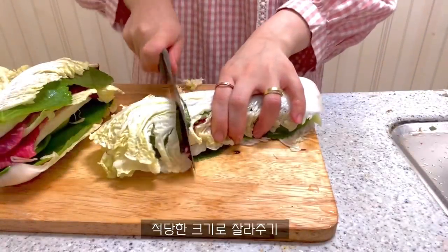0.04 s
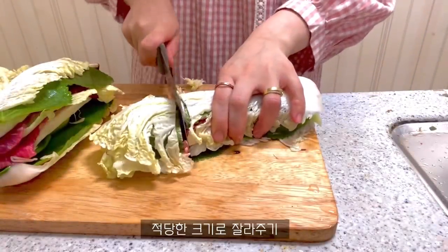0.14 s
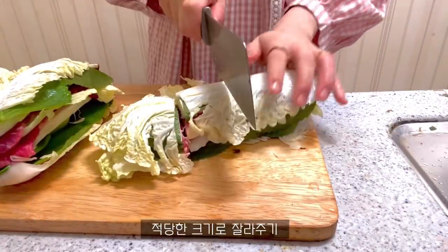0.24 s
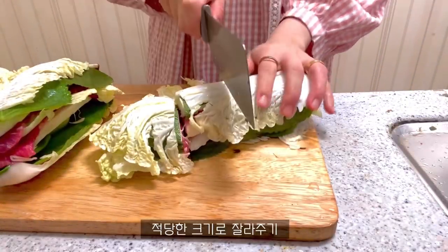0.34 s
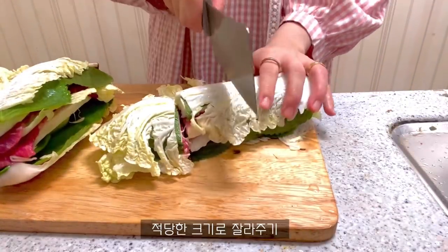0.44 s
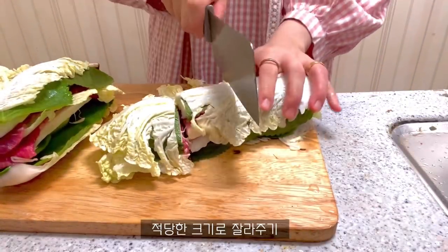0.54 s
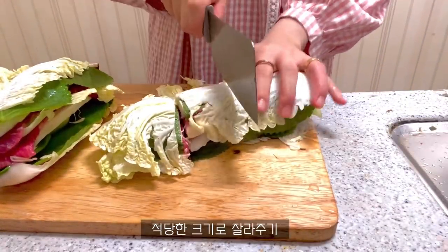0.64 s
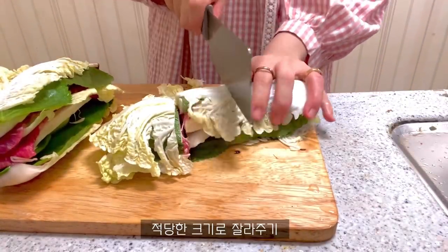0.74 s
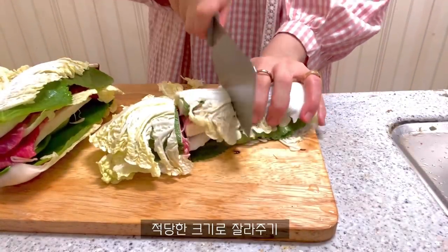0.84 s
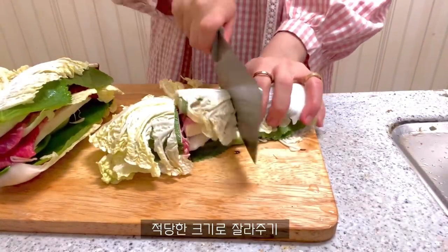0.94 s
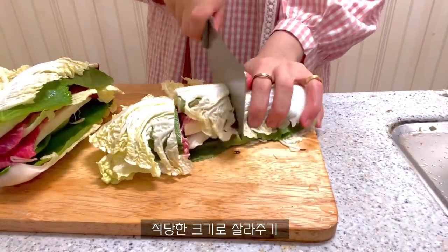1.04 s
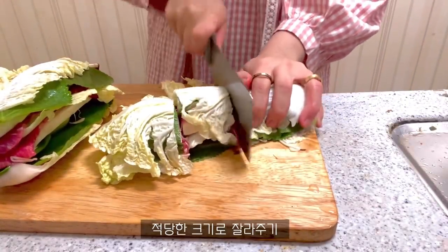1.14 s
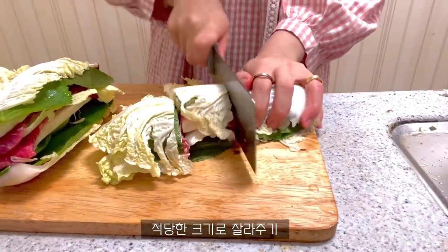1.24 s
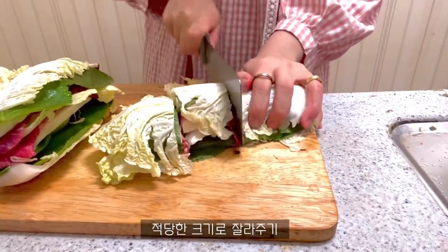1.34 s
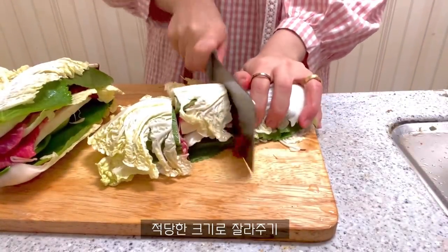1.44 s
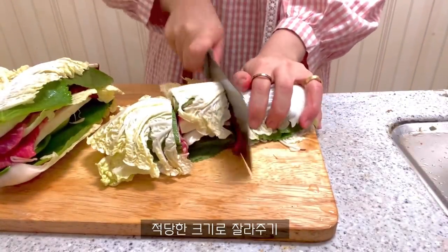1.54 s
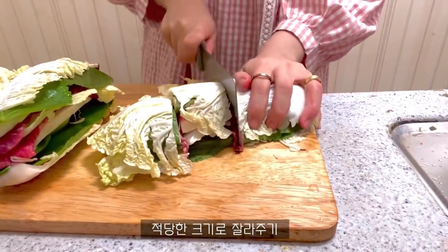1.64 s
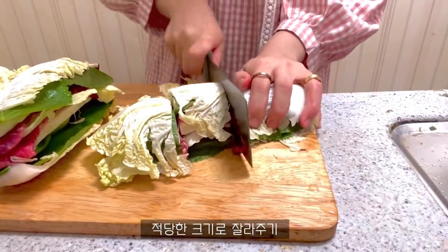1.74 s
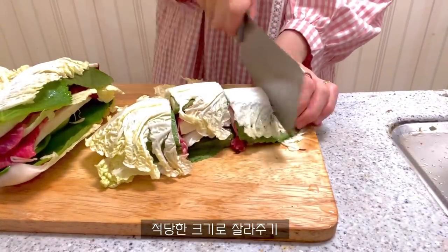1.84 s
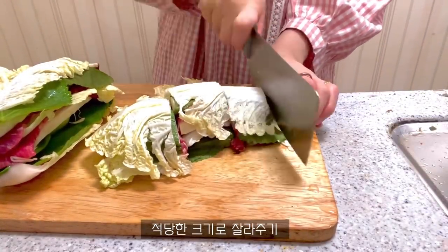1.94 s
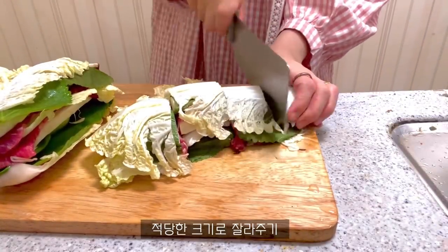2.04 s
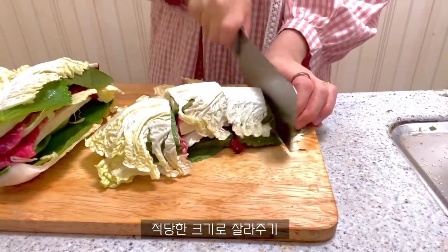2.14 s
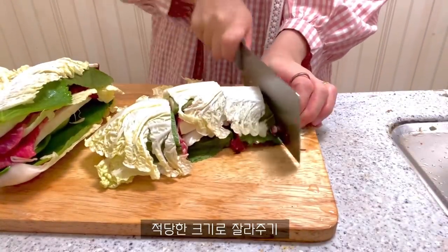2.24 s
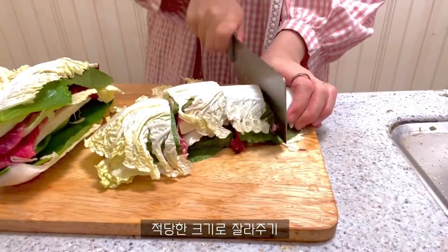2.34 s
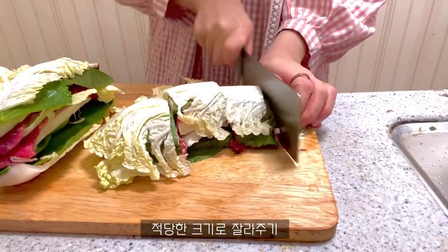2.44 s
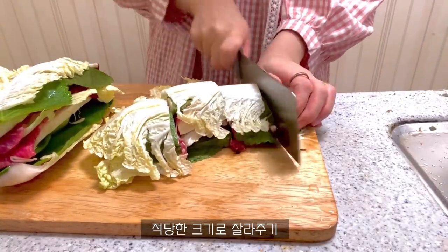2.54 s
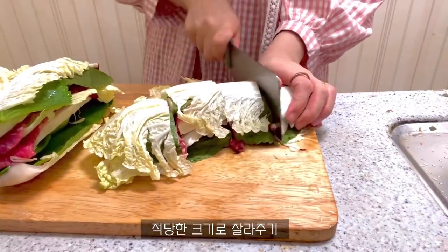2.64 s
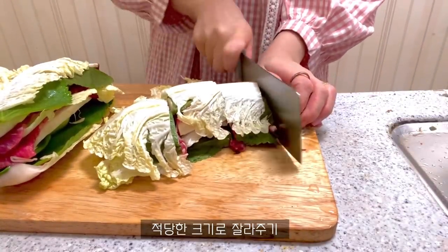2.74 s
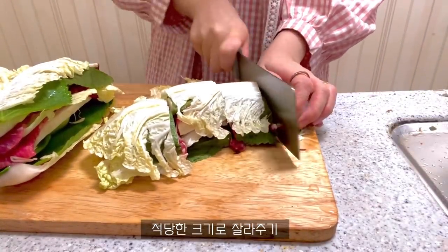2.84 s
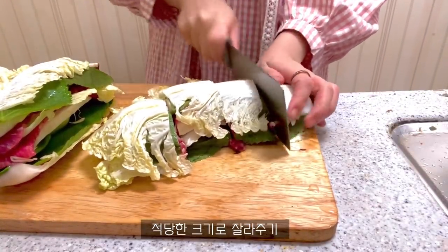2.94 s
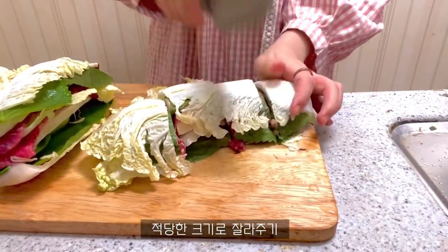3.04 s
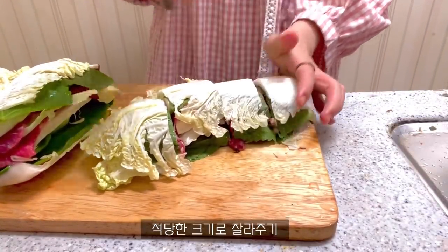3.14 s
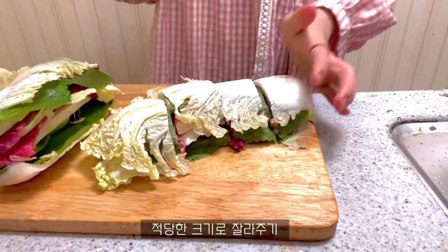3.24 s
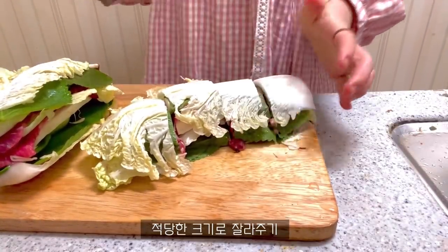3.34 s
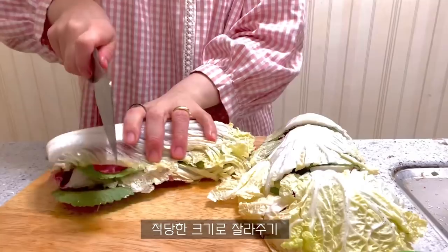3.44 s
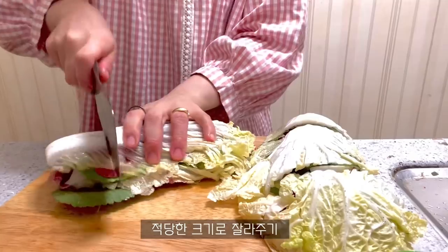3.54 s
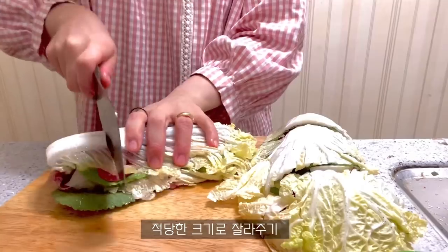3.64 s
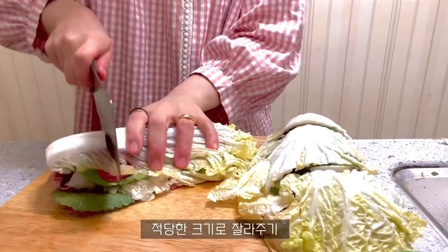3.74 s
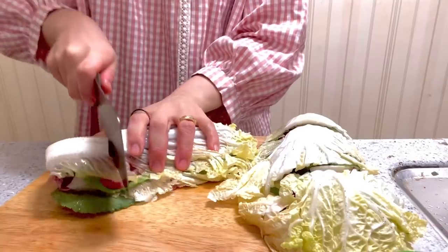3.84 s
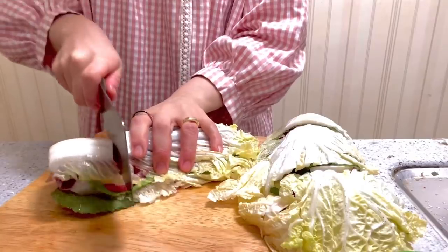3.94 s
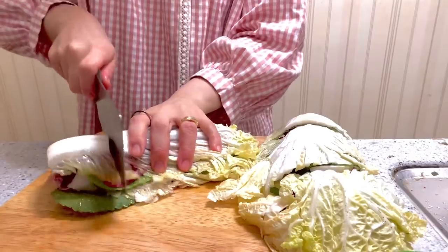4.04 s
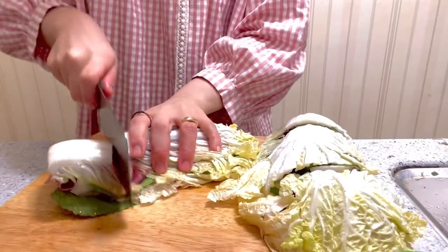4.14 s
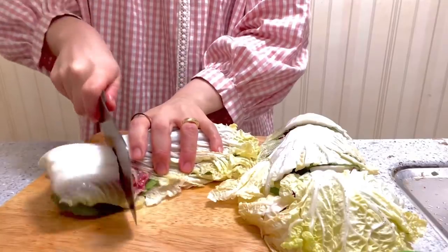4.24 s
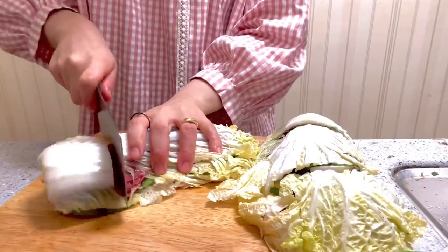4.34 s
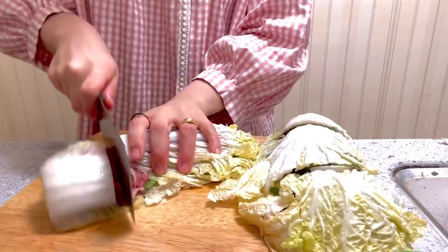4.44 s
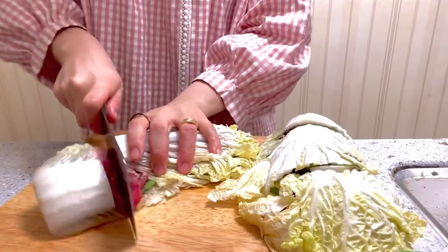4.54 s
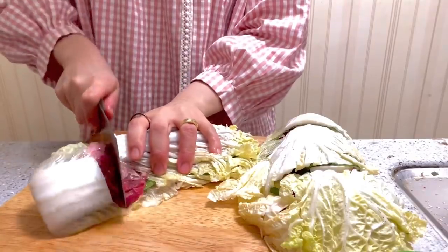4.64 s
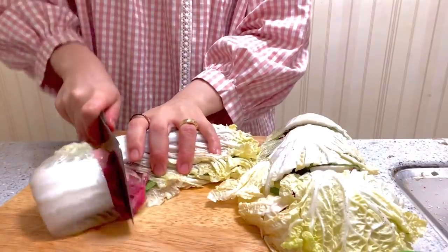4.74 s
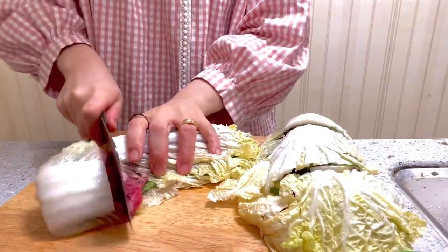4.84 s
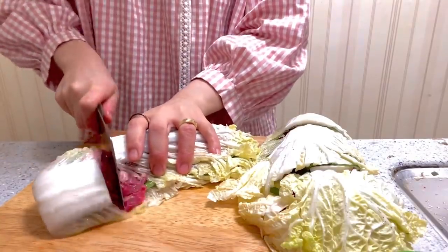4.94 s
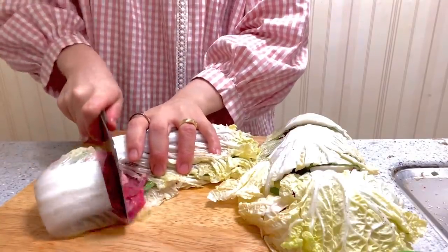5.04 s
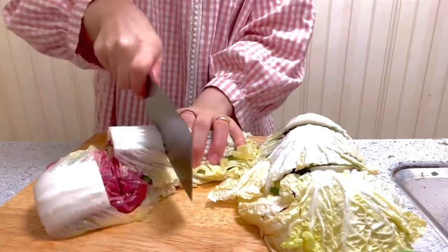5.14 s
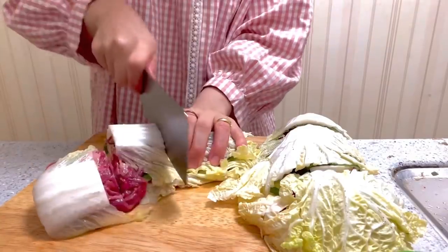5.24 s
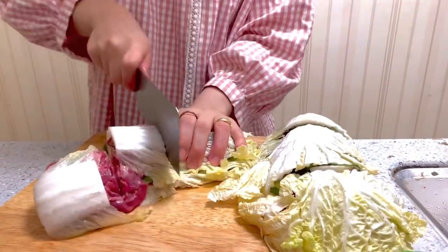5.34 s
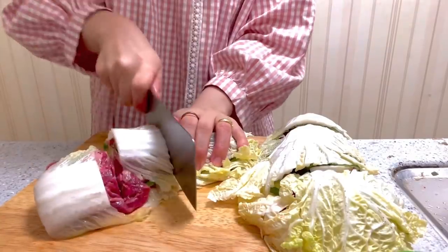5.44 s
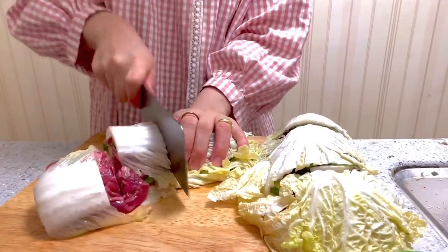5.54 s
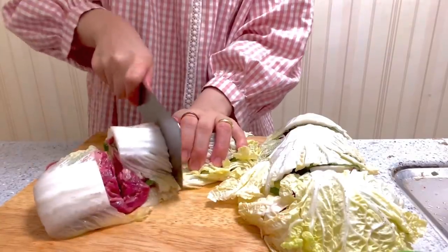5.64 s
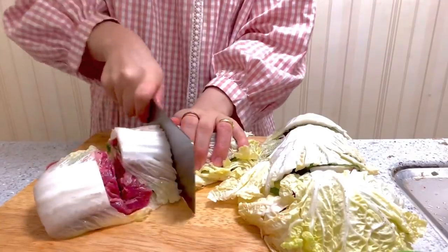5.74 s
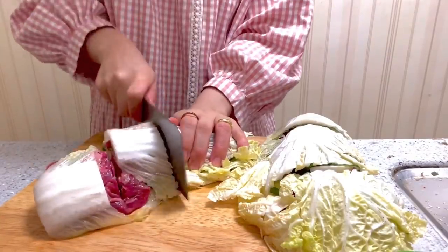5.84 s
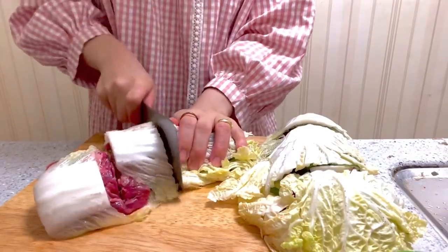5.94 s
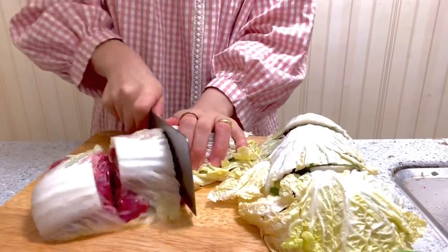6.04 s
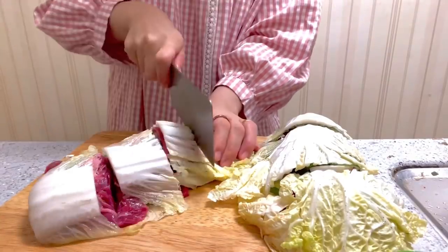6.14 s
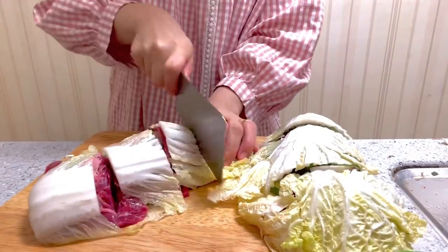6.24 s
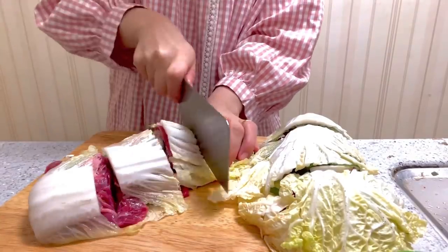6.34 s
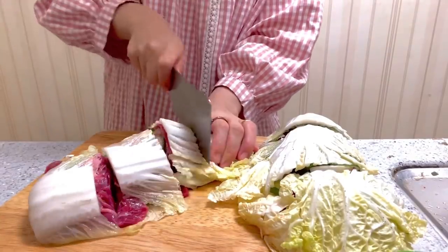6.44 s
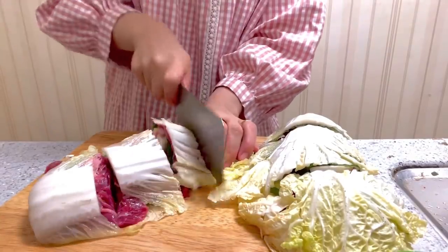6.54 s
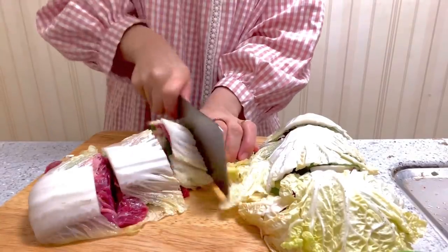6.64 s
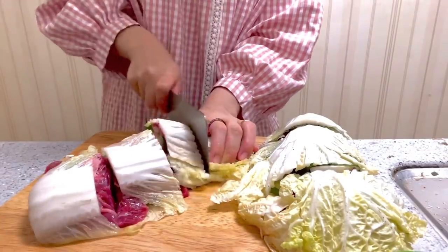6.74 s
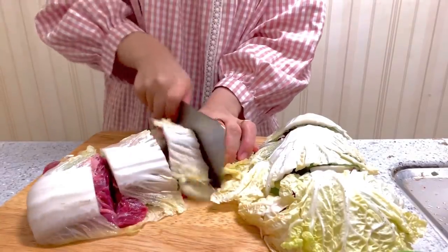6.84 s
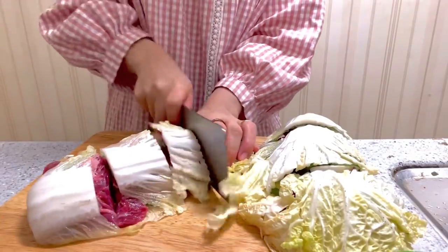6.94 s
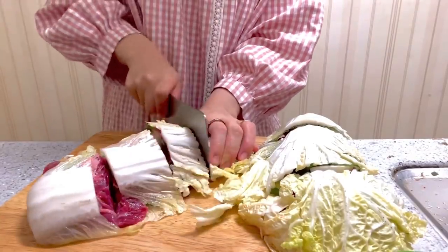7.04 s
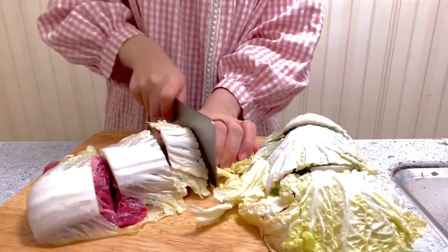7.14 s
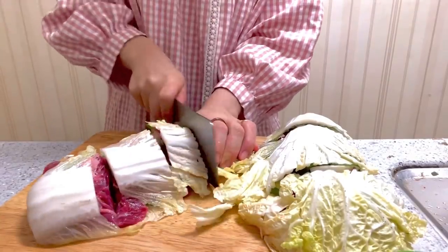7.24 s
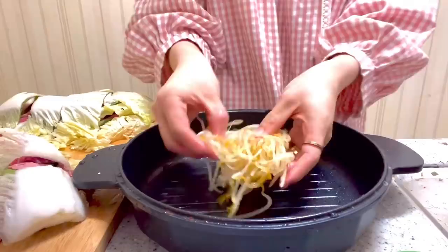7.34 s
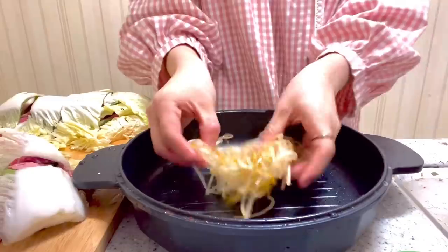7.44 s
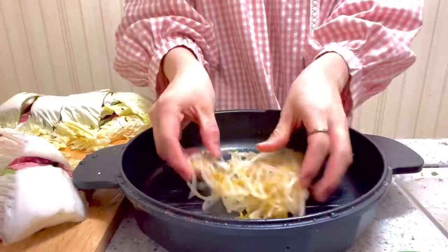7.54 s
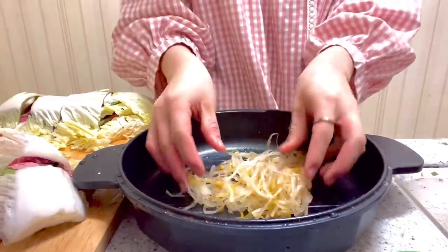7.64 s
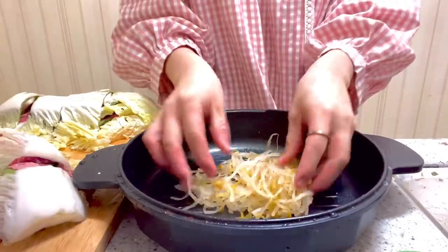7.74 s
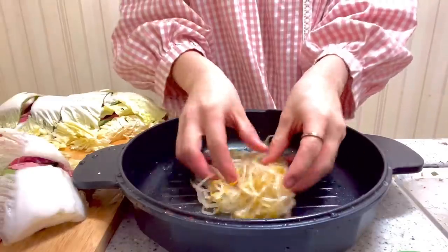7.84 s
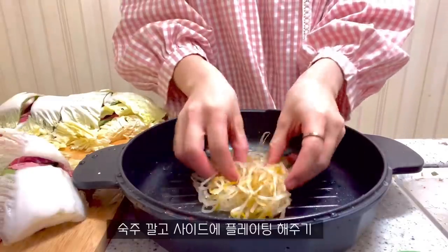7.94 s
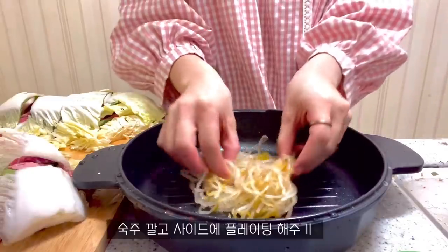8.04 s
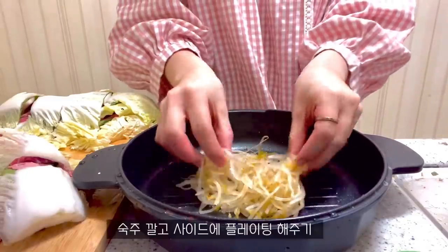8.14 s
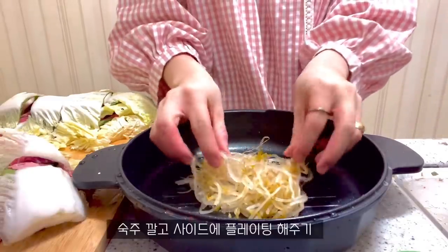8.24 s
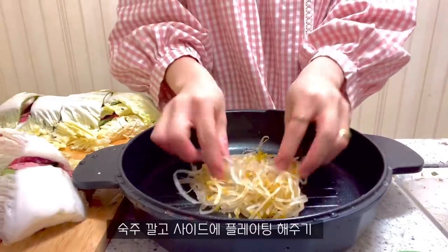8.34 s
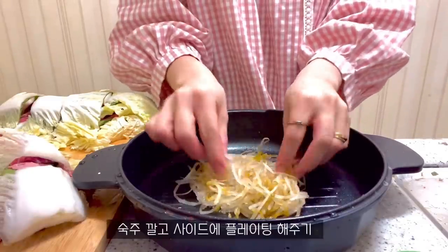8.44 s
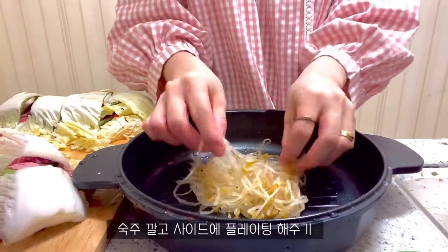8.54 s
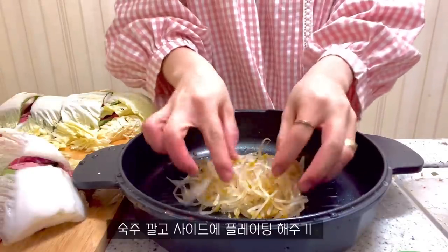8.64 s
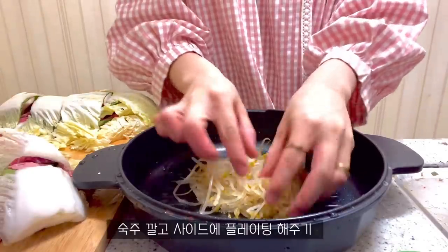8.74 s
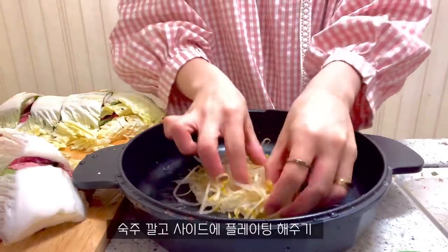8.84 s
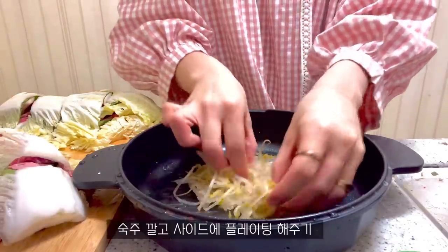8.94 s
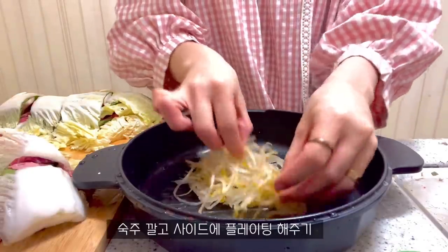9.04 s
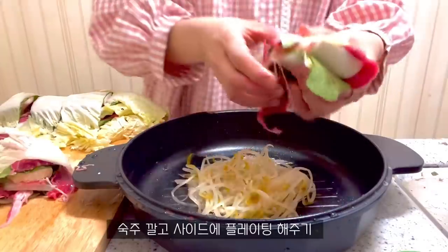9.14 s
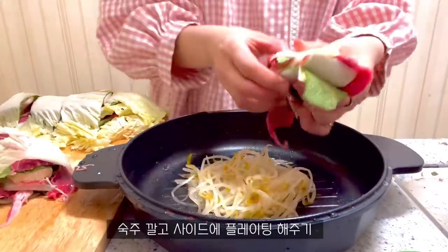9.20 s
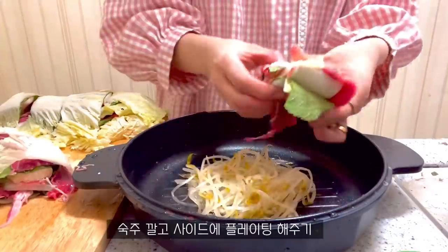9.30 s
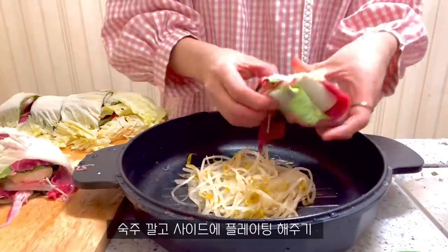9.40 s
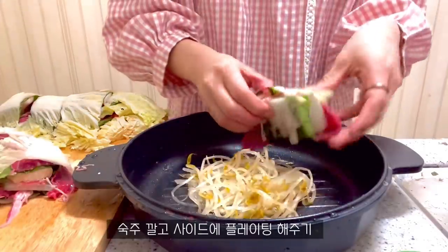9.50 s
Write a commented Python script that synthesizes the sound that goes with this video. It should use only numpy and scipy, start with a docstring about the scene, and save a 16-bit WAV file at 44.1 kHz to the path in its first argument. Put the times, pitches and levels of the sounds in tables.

```python
"""Cutting cabbage, spreading sprouts

A knife crunches through stacked cabbage leaves: cells burst, ribs snap, wet leaves squeak on the steel.
The blade knocks on a wooden board and saws through the last fibres; the hand rocks the board.
Then hands spread bean sprouts in a pot, a deep judder swells and is cut off, kitchenware clinks twice.
An appliance hums in the small kitchen. Stereo: two closely spaced microphone ports."""
import sys
import numpy as np
from scipy import signal
from scipy.fft import rfft, irfft, next_fast_len
from scipy.io import wavfile
from scipy.ndimage import uniform_filter1d, map_coordinates

SR = 44100
rng = np.random.default_rng(int(sys.argv[2]) if len(sys.argv) > 2 else 0)


def unload_wav(signal):
    """Save mono or channel-first audio to the path in sys.argv[1] as 16-bit WAV at rate SR, clipped to [-1, 1]."""
    wavfile.write(
        sys.argv[1],
        SR,
        np.round(np.clip(np.atleast_2d(signal).T, -1, 1) * 32767).astype(np.int16),
    )


N = 422037
T = np.arange(N) / SR
MAX_T60_S = 0.3  # cap on board and counter modes

# Table levels are relative; each source adds its own gain.
# blade and fingers pushing into the leaves: t/s, build-up/s, release/s, crackle/dB, crunch/dB
PUSHES = [(0.281, 0.0074, .07, -62.5, -63), (0.514, 0.0061, 0.035, -59, -74),
          (0.634, 0.039, 0.15, -50.5, -53.5), (.735, 0.017, 0.021, -41, -57.5),
          (.785, 0.046, 0.17, -44, -43.5), (.945, 0.059, 0.1, -48, -52), (1.085, 0.0072, 0.041, -36, -36),
          (1.141, 0.033, 0.02, -45, -46), (1.23, 0.023, 0.31, -47, -52.5), (1.334, 0.046, .08, -41, -38),
          (1.799, 0.014, 0.068, -42.5, -50.5), (1.858, 0.061, 0.025, -40, -38.5),
          (1.97, 0.0099, .06, -41, -50), (2.037, 0.018, .025, -42.5, -41.5), (2.079, 0.069, .2, -40, -44.5),
          (2.34, 0.062, 0.067, -41, -40), (2.93, 0.011, 0.184, -63.5, -61), (3.435, 0.01, 0.11, -58.5, -56),
          (3.478, 0.038, 0.039, -37.5, -42.5), (3.58, 0.032, 0.14, -62, -63),
          (3.814, 0.018, 0.21, -51.5, -52.5), (3.98, .052, 0.025, -51.5, -58.5),
          (4.07, 0.018, 0.15, -52.5, -57.5), (4.135, 0.044, 0.05, -44.5, -55),
          (4.275, 0.022, .07, -59.5, -50.5), (4.397, 0.059, 0.096, -42, -42),
          (4.56, 0.063, .1, -61.5, -56.5), (4.664, 0.044, 0.092, -42, -40), (5.08, 0.046, .15, -56.5, -56),
          (5.204, 0.024, 0.072, -49, -49.5), (5.318, 0.11, 0.068, -47.5, -43.5),
          (5.475, 0.035, 0.19, -54, -53), (5.624, 0.031, .11, -47.5, -47),
          (5.798, 0.033, 0.018, -61.5, -42), (6.08, 0.029, 0.053, -46, -57.5),
          (6.169, 0.051, 0.11, -49.5, -53.5), (6.319, 0.074, 0.058, -49.5, -55.5),
          (6.454, .02, 0.09, -43, -50), (6.495, .07, 0.05, -39, -42.5), (6.61, 0.067, .14, -45.5, -47)]
# thick ribs snapping: t/s, crack/dB, hollow body/dB
RIB_SNAPS = [(0.5221, -34.5, -43), (0.7483, -22, -26), (0.803, -31, -43.5), (0.814, -12.5, -27.5),
             (.827, -21, -24), (.842, -27, -32), (.955, -34, -51), (.968, -31.5, -50), (1.0872, -25, -35),
             (1.095, -14, -16), (1.104, -20, -27), (1.254, -29, -42), (1.3633, -42, -25), (1.383, -32, -24),
             (1.3915, -11, -11.5), (1.786, -33, -42.5), (1.8119, -13, -21), (1.8683, -16.5, -23.5),
             (1.895, -18.5, -34.5), (1.9757, -18.5, -17), (1.9894, -16, -22.5), (2.051, -22, -47),
             (2.1547, -22, -21.5), (2.1605, -21.5, -20), (2.1957, -19, -39), (2.3469, -24, -29),
             (2.3836, -25, -18.5), (2.4074, -9, -18), (2.5533, -18, -35), (2.9703, -29.5, -50),
             (3.4834, -23.5, -28), (3.836, -33, -34), (4.0738, -28, -56.5), (4.1589, -25, -39.5),
             (4.1825, -24.5, -33), (4.2378, -29, -33.5), (4.305, -22.5, -41), (4.4246, -21, -37),
             (4.4864, -16.5, -41.5), (4.638, -36.5, -28.5), (4.656, -37.5, -34), (4.6718, -35.5, -23.5),
             (4.680, -18, -31), (4.737, -9.5, -19), (4.791, -19, -48), (5.0895, -26, -58),
             (5.134, -33, -41), (5.177, -26.5, -49), (5.2341, -28.5, -46), (5.327, -26.5, -44),
             (5.3772, -16, -37), (5.413, -22, -50), (5.4333, -26, -37), (5.4799, -13.5, -13.5),
             (5.521, -30.5, -33), (5.528, -24, -41.5), (5.6338, -17.5, -34.5), (5.639, -24, -39),
             (5.653, -24.5, -44), (5.666, -21, -43), (5.6722, -16.5, -22), (5.770, -36.5, -30.5),
             (5.8269, -38.5, -35), (5.8974, -39.5, -26.5), (5.9219, -35.5, -19.5), (5.9679, -32.5, -20),
             (6.103, -32, -47), (6.118, -30.5, -49), (6.2216, -24.5, -39.5), (6.464, -20.5, -30),
             (6.5067, -22, -26.5), (6.621, -29.5, -39), (6.6724, -18.5, -17.5), (6.712, -30, -27),
             (6.754, -29, -20.5), (9.451, -35, -50)]
# knife on board: t/s, wood/dB, wood f/Hz, counter thump/dB, board flex/dB, crack/dB, crack f/Hz,
# t60 factor under load
KNOCKS = [(0.455, -31.5, 480, -26, -40, -54, 2200, 0.79), (0.699, -17.5, 540, -17.5, -32, -27, 1310, 0.85),
          (1.4097, -4, 930, -25.5, -34.5, -26, 1900, 0.63),
          (1.4179, -15.5, 1090, -47, -45, -33, 1900, 1.08), (2.194, -22, 970, -30.5, -33, -30, 2200, 0.49),
          (2.41, -10, 515, -23, -18, -22, 3030, 0.6), (2.422, -11.5, 443, -26, -31.5, -36, 1500, 0.78),
          (3.126, -37, 1040, -47, -50, -35, 2400, 1.3), (3.136, -18.5, 1095, -27, -32, -25, 1860, 0.85),
          (3.151, -20, 1440, -20.5, -30, -37, 2200, 0.73), (3.157, -26.5, 420, -36, -37, -48, 1500, 0.76),
          (3.524, -26, 550, -33, -45, -31.5, 2410, 0.45), (4.464, -6, 782, -15, -17, -15, 2260, 0.51),
          (4.477, -17, 680, -27, -24, -43, 2050, 0.58), (4.744, -32, 765, -17.5, -24, -46, 2380, 0.33),
          (5.693, -10.5, 745, -21.5, -29.5, -45, 1300, 0.6)]
# sawing strokes: start/s, end/s, rasp/dB, rasp f/Hz, fibre tearing/dB
STROKES = [(-.06, 0.23, -44, 970, -55), (1.507, 1.646, -42, 970, -52), (1.648, 1.769, -40.5, 970, -60),
           (2.1, 2.236, -42.5, 1040, -58.5), (2.507, 2.636, -44.5, 1044, -49.5),
           (2.646, 2.784, -47, 1160, -55.5), (2.801, 2.92, -48.5, 890, -58.5),
           (4.684, 4.801, -34.5, 770, -54), (4.817, 4.935, -40.5, 740, -56.5),
           (4.953, 5.104, -50.5, 805, -56.5), (5.783, 5.924, -48.5, 880, -60.5),
           (5.901, 6.062, -42, 745, -51), (6.058, 6.16, -50, 1000, -59), (6.683, 6.89, -39, 890, -50),
           (6.904, 7.048, -41.5, 950, -52), (7.06, 7.183, -45.5, 1030, -58.5),
           (7.203, 7.395, -39.5, 1120, -54.5)]
# abrupt cutoffs of rasp and crunch: t/s
CUTOFFS = [0.188, 7.358]
# wet leaves on steel: t/s, length/s, level/dB, start f/Hz, end f/Hz
SQUEAKS = [(1.964, 0.044, -37, 1978, 1776), (4.006, 0.048, -47, 2282, 2686),
           (4.141, 0.077, -37, 2400, 2966), (4.269, 0.039, -51.5, 1108, 1700),
           (4.341, 0.058, -56.5, 1330, 820), (4.696, 0.058, -36.5, 2400, 2683)]
# hand shoving the board: t/s, level/dB
SHOVES = [(0.0, -28.5), (0.152, -32.5), (0.826, -25), (0.9, -34), (1.093, -20), (1.229, -31), (1.334, -34),
          (1.509, -24.5), (1.636, -27), (1.819, -23), (2.149, -21.5), (2.375, -30), (2.5, -25.5),
          (2.641, -27.5), (2.784, -28.5), (3.15, -25), (3.519, -22), (4.173, -24.5), (4.499, -28),
          (4.755, -38), (4.931, -27), (5.229, -30.5), (5.42, -32.5), (5.481, -30), (5.789, -28.5),
          (5.967, -28.5), (6.05, -29.5), (6.51, -32), (6.718, -28.5), (6.89, -28), (7.048, -27.5),
          (7.193, -32)]
# handfuls of sprouts shifted: t/s, length/s, level/dB
HANDFULS = [(7.321, 0.37, -67), (7.669, 0.49, -63.5), (8.317, 0.22, -72), (8.692, 0.33, -61),
            (9.029, 0.37, -71.5)]
# contacts with the pot: t/s, level/dB, rise/s, fall/s, favoured f/Hz
POT_RUBS = [(7.41, -49.5, .008, 0.05, 199), (7.43, -56, 0.022, 0.029, 1830), (7.52, -52.5, .022, .025, 900),
            (7.59, -57, 0.018, 0.019, 1410), (7.647, -44.5, 0.0063, 0.028, 890),
            (8.1, -67.5, 0.026, 0.029, 1100), (8.385, -45, .018, 0.019, 400),
            (8.399, -57, .015, .025, 1150)]
# kitchenware contacts: t/s, level/dB, rise/s, favoured f/Hz, favour/dB, grit/dB
CLINKS = [(9.3346, -13, 0.00078, 2650, -4.5, -13), (9.3455, -25.5, 0.00087, 3830, 5, -16),
          (9.417, -28, 0.0057, 1580, 30.5, -17)]
# board and counter modes: f/Hz, level/dB, t60/s before load and cap
BOARD_MODES = [(49.7, -4.5, 0.2), (70.1, -9, 0.3), (121, -9, 0.11), (134.1, 1.5, 0.15), (170, -4.5, 0.038),
               (228, -1, 0.086), (255.7, 2.5, 0.16), (417.2, -1, 0.15), (475, 3, 0.056), (611, -3, .1),
               (761, 1, 0.11), (858, -0.5, 0.15), (913, -3.5, 0.13), (1011, -2.5, 0.12), (1124, -4.5, 0.2),
               (1410, -4.5, 0.084), (1500, -4.5, 0.11), (1590, -13, .12), (2650, -7.5, 0.13),
               (3120, -15.5, 0.07)]
# board rocking on the counter: f/Hz, level/dB, t60/s before cap
ROCKING_MODES = [(42.16, -3, 0.43), (63.5, -5, 0.46), (117.4, -6, 0.17), (226.8, -16, 0.23)]
# kitchenware modes: f/Hz, level/dB, t60/s
WARE_MODES = [(373, -26, 0.06), (930, -16.5, 0.18), (1025, -15.5, 0.075), (1646, -35.5, 0.9),
              (1780, -33, 0.14), (2200, -6, 0.058), (2580, -22.5, 0.67), (2597, -3.5, 0.11),
              (3380, -18, 0.13), (3756, -19, 0.2), (3845, -7.5, 0.075), (4690, -24, 0.061),
              (5227, -25, 0.13), (6700, -24, 0.063), (7690, -26, 0.063), (7903, -24, 0.05),
              (9100, -33, 0.067)]
# blade gripped by leaves: f/Hz, width/Hz, level/dB
BLADE_RESONANCES = [(526, 35, -8), (611, 45, -7.5), (878, 45, -1.5), (1092, 51, -0.5), (1130, 63, 0.5),
                    (1398, 25, -8.5), (1504, 110, -7), (1570, 50, -6), (1990, 170, -14.5),
                    (2660, 90, -10.5), (3570, 780, -23)]
# pot wall: f/Hz, width/Hz, level/dB
POT_RESONANCES = [(198, 15, 13.5), (460, 34, 1), (610, 21, -21), (890, 19, 1), (1170, 15, 0.5),
                  (1430, 16, -10), (1844, 29, -10.5), (2270, 120, -7), (2900, 140, -14)]
# thin-leaf crackle: f/Hz, level/dB
CRISP_SPECTRUM = [(300, -54.5), (1500, -0.5), (3000, -2.5), (4400, -0.5), (6500, -3.5), (9300, -1),
                  (11000, -5), (13000, -3), (15500, -4)]
# wet-rib crunch: f/Hz, level/dB
JUICY_SPECTRUM = [(100, -40), (300, -4.5), (600, 5), (1100, 4), (1900, 2), (3000, -4), (5000, -13.5),
                  (10000, -28.5)]
# sprout rustle: f/Hz, level/dB
SPROUT_SPECTRUM = [(300, 2), (1200, 1), (4000, -0.5), (8500, -1), (12000, -2), (15500, 1.5)]
# appliance hum: f/Hz, level/dB
HUM_LINES = [(71, -46), (108, -49.5), (133, -42), (240, -55), (257, -56)]
# room noise: f/Hz, level/dB
ROOM_SPECTRUM = [(15, -22), (35, -9.5), (55, -8), (85, -10), (130, 3.5), (175, -14), (255, -15.5),
                 (350, -19), (600, -26.5), (1000, -36.5), (3000, -47), (9000, -53), (16000, -53)]
# room decay: f/Hz, t60/s
ROOM_DECAY = [(130, 0.42), (1000, 0.12), (4000, 0.18), (14000, 0.098)]
# left-right likeness: f/Hz, coherence
COHERENCE = [(30, 1), (70, 0.63), (250, 0.46), (700, 0.062), (3000, 0.17), (6000, 0.37), (8500, 0.98),
             (12000, 0.99), (15000, .85)]


def leaves_and_sprouts():
    """Thin leaves crackle, thick wet ribs crunch lower; sprouts only rustle."""
    crisp, juicy = bursting_gains()
    fibres = crackle(CRISP_SPECTRUM, per_s=750, spread_db=7.5, clump_db=2.0, hiss=0.22)
    pulp = crackle(JUICY_SPECTRUM, per_s=400, spread_db=4, clump_db=2.5, hiss=0.2)
    cells = amp(5.5) * wet_pops(per_s=550, hz=1805, pitch_spread=0.5, spread_db=2.5, cycles=3.2)
    stirring = sum(amp(db) * hand_speed(s, length_s) ** 1.5 for s, length_s, db in HANDFULS)
    rustle = amp(9) * stirring * crackle(SPROUT_SPECTRUM, per_s=610, spread_db=2, clump_db=2, hiss=0.39)
    thin = pockets(amp(4) * crisp * fibres, depth_db=2.5)
    return thin + pockets(juicy * (pulp + cells) + rustle, depth_db=5)


def bursting_gains():
    """Crackle and crunch gains: pushes build, release and settle; strokes tear with blade speed."""
    power, t = np.zeros((2, N)), np.arange(SR // 2) / SR
    for s, build_s, release_s, crisp_db, juicy_db in PUSHES:
        after_s = np.maximum(t - build_s, 0)
        release = amp(-16.5 * (after_s / release_s) ** 0.94)
        settling = amp(-17) * np.exp(-after_s / 0.15)
        push = np.minimum(t / build_s, 1) * np.maximum(release, settling)
        add(power, s, (amp([[crisp_db], [juicy_db]]) * push) ** 2)
    for start, end, _, _, db in STROKES:
        power += (amp([[db], [db - 1.5]]) * hand_speed(start, end - start) ** 0.94) ** 2
    return np.sqrt(power) * cutoff_gate()


def crackle(spectrum, per_s, spread_db, clump_db, hiss):
    """Bursting cells: clumps of tiny, unequal pops on a fine hiss; rms 1."""
    sizes = amp(spread_db * np.minimum(rng.standard_normal(N), 2)) * (rng.random(N) < per_s / SR)
    decay = np.exp(-np.arange(SR // 200) / SR / 0.0071)
    envelope = unit(np.sqrt(np.abs(signal.fftconvolve(sizes ** 2, decay)[:N])))
    bursts = (envelope + hiss) * amp(clump_db * wobble(70)) * noise(N)
    return unit(ports(bursts, eq(spectrum)))


def wet_pops(per_s, hz, pitch_spread, spread_db, cycles):
    """Juice-filled cells burst, each ringing a few cycles at its own pitch; rms 1."""
    count = int(per_s * N / SR)
    draw = rng.standard_normal((count, 5))  # pitch, two sizes, two phases
    k = np.arange(SR // 125)
    index = (rng.integers(0, N, count)[:, None] + k).ravel()
    turns = np.minimum(hz * np.exp(pitch_spread * draw[:, :1]), SR / 4) * k / SR
    size = amp(spread_db * np.minimum(draw[:, 1:2], 1.5) + 2 * draw[:, 2:3])
    envelope = size * np.exp(-turns / cycles) * (1 - k / len(k))
    pops = [envelope * np.sin(2 * np.pi * turns + phase[:, None]) for phase in draw[:, 3:].T]
    pair = np.array([np.bincount(index, pop.ravel(), N)[:N] for pop in pops])
    return unit(ports(pair, eq([(200, 2.5), (700, -8.5), (4000, -7.5), (12000, -26)])))


def pockets(x, depth_db):
    """Gaps between leaves open and close: short-lived resonances."""
    spectra = signal.stft(x, nperseg=512)[2]
    field = uniform_filter1d(rng.standard_normal(spectra.shape[1:]), size=3, axis=0)
    field = uniform_filter1d(field, size=9, axis=1)
    gain = unit(amp(depth_db * np.clip(unit(field), -2, 1.7)))
    return signal.istft(spectra * gain, nperseg=512)[1][:, :N]


def rib_snaps():
    """A rib breaks: sharp crack, wet ping, hollow pop, then a cluster of smaller breaks."""
    ping_t60_s, mean_gap_s = 0.016, 0.007
    t = np.arange(SR // 8) / SR
    crack, pop, tear = np.zeros((3, 2, N))
    for s, db, body_db in RIB_SNAPS:
        spike = 1.5 * burst(t, 0.002)
        ping_hz = min(4340 * np.exp(0.55 * rng.normal()), SR / 4)
        ping = np.sin(2 * np.pi * (ping_hz * t + rng.random((2, 1)))) * amp(-8.5 - 60 * t / ping_t60_s)
        breaks_s = np.cumsum(rng.exponential(mean_gap_s, 24))
        cluster = unit(0.55 + np.exp(-np.abs(t - breaks_s[:, None]) / 0.0008).sum(0))
        snap = spike + ping + 0.7 * burst(t, 0.0073) + 0.3 * cluster * burst(t, 0.052)
        add(crack, s + 0.00084, amp(db - 5) * snap)
        add(pop, s + 0.00099, amp(body_db + 4.5) * burst(t, 0.008))
        add(tear, s + 0.0019, amp(body_db - 3.5) * cluster * burst(t, 0.085))
    wet = eq(JUICY_SPECTRUM)
    return ports(crack, eq(CRISP_SPECTRUM)) + ports(pop, wet) + pockets(ports(tear, wet), depth_db=4)


def knife_knocks():
    """The blade lands: edge crack, dense wooden clack, modes of board and counter."""
    out, t = np.zeros((2, N)), np.arange(SR // 2) / SR
    rise = np.clip((t - 0.0008) / 0.001, 0, 1)
    sized = lambda x: unit(x) / np.sqrt(len(t) / (0.004 * SR))  # energy of 4 ms at rms 1
    for s, wood_db, hz, thump_db, flex_db, crack_db, crack_hz, t60_factor in KNOCKS:
        blow = [(140, thump_db + 5.5), (245, flex_db + 3.5), (hz, wood_db - 7), (2800, crack_db - 5.5)]
        # the load of leaves and hand shifts and damps the modes
        modes = [(f * np.exp(rng.normal(0, 0.018)), db + along(blow, f), min(t60 * t60_factor, MAX_T60_S))
                 for f, db, t60 in BOARD_MODES]
        # leaves cushion the edge; a harder blow is brighter
        cushion_hz = 3400 * 2 ** ((crack_db + 24) / 24)
        cushion = lambda f: 1 / (4 + (f / cushion_hz) ** 8)
        first_swing = np.sin(2 * np.pi * hz * t) * t * np.exp(-t * hz / 0.62)
        clack = ports(rise * (burst(t, 0.029) + 0.93 * burst(t, 0.08)),
                      lambda f: resonance(f, hz, hz * 0.84) ** 2 * cushion(f))
        crack = ports(rise * (burst(t, 0.037) + 0.12 * burst(t, 0.044)),
                      lambda f: resonance(f, crack_hz, crack_hz * 1.6) ** 3 * cushion(f))
        wood = amp(wood_db - 9) * sized(first_swing) + amp(wood_db - 12) * sized(clack)
        board = ring(modes, t, rise_cycles=1.36, spread_rad=0.73)
        add(out, s + 0.0005, board + wood + amp(crack_db - 1) * sized(crack))
    return out


def sawing():
    """The edge drags over wood in fine slips, exciting a broad rasp, the blade and the board."""
    out, slips_per_s = np.zeros((2, N)), 520
    blade = lambda f: sum((-1) ** k * amp(db) * resonance(f, hz, width)
                          for k, (hz, width, db) in enumerate(BLADE_RESONANCES))
    board_groan = lambda f: amp(-7.5) * resonance(f, hz=427, width_hz=38)
    for start, end, db, hz, _ in STROKES:
        n = round((end - start) * SR)
        slips = (rng.random(n) < slips_per_s / SR) * noise(n) + 0.1 * noise(n)
        broad = lambda f: amp(-3.5) * np.abs(resonance(f, hz, hz * 0.51)) ** 2
        rasp = unit(ports(slips, lambda f: np.hypot(broad(f), np.abs(blade(f))) + board_groan(f)))
        speed = np.sin(np.pi * np.arange(n) / n)
        stroke = amp(db + 2) * rasp * speed ** 0.59
        add(out, start, stroke[:, max(round(-start * SR), 0):])
    catching = amp(1.24 * wobble(45))  # edge catches and frees itself
    return out * catching * cutoff_gate()


def leaf_squeaks():
    """Wet leaves stick and slip on steel: a ragged, gliding chirp."""
    out = np.zeros((2, N))
    for s, length_s, db, start_hz, end_hz in SQUEAKS:
        n = round(length_s * SR)
        lowpass = lambda f: 1 / (1 + (f / (0.37 * start_hz)) ** 2)
        ragged = unit(filtered(rng.standard_normal((2, 2, n)), lowpass))
        phase = 2 * np.pi * np.cumsum(np.linspace(start_hz, end_hz, n)) / SR
        chirp = ragged[0] * np.sin(phase) + ragged[1] * np.cos(phase)
        add(out, s, amp(db + 3) * ports(chirp * np.hanning(n), np.ones_like))
    return out


def board_shoves():
    """The hand's weight rocks the board: a dull, low thud."""
    out, t = np.zeros((2, N)), np.arange(SR // 2) / SR
    for s, db in SHOVES:
        modes = [(hz * np.exp(rng.normal(0, 0.097)), db + mode_db, min(t60, MAX_T60_S))
                 for hz, mode_db, t60 in ROCKING_MODES]
        add(out, s, ring(modes, t, rise_cycles=0.46, spread_rad=0.6))
    return out


def pot_rubs():
    """Fingers and sprouts brush the pot; each contact favours a different part of its hollow ring."""
    lead_s, favour_db, reach_oct = 0.1, 13.5, 0.62
    out, t = np.zeros((2, N)), np.arange(SR // 3) / SR - lead_s
    wall = lambda f: sum(amp(db) * resonance(f, hz, width) for hz, width, db in POT_RESONANCES)
    for s, db, rise_s, fall_s, favoured_hz in POT_RUBS:
        favour = lambda f: amp(favour_db * np.exp(-(np.log2((f + 1) / favoured_hz) / reach_oct) ** 2))
        hollow = unit(ports(noise(len(t)), lambda f: wall(f) * favour(f)))
        envelope = np.exp(-0.5 * (t / np.where(t < 0, rise_s, fall_s)) ** 2)
        add(out, s - lead_s, amp(db) * hollow * envelope)
    return out


def ware_clinks():
    """Pieces chatter together: a hard clink, its rebound, a softer touch waking the longest mode."""
    out, t = np.zeros((2, N)), np.arange(SR // 2) / SR
    grit_eq = eq([(300, -6), (1000, 2.5), (3000, 8), (9500, -1.5), (12000, -29)])
    for s, db, rise_s, favoured_hz, favour_db, grit_db in CLINKS:
        modes = [(hz, mode_db + favour_db * np.exp(-(np.log(hz / favoured_hz) / 0.28) ** 2), t60)
                 for hz, mode_db, t60 in WARE_MODES]
        grit = amp(grit_db) * ports(burst(t, 0.081), grit_eq)
        chatter = 1 + 0.35 * np.exp(-t / 0.04) * wobble(460)[:len(t)]
        ringing = chatter * ring(modes, t, rise_cycles=0.94, spread_rad=0.67)
        add(out, s, amp(db) * (1 - np.exp(-t / rise_s)) * (ringing + grit))
    return out


def deep_judder():
    """A deep judder swells until an edit cuts it off with a dull click."""
    judder_hz, cut_s, swell_s, fade_s = 26.48, 9.104, 0.14, 0.001
    swell = np.clip(1 + (T - cut_s) / swell_s, 0, 1) ** 2 * np.clip(1 - (T - cut_s) / fade_s, 0, 1)
    judder = sum(amp(db) * np.sin(2 * np.pi * (harmonic * judder_hz * T + rng.random()))
                 for harmonic, db in enumerate([-30, -22.5, -26.5, -24.5], 1))
    edit_click = filtered(np.exp(-np.abs(T - cut_s) / 0.00004), lambda f: 1 / (1 + 1j * f / 500))
    return swell * judder + amp(-16.5) * edit_click


def counter_rumble():
    """The counter trembles while the knife works."""
    working = np.interp(T, [7.3, 7.38], [1, 0])
    return amp(-49) * working * unit(ports(noise(N), lambda f: resonance(f, hz=57, width_hz=34) ** 2))


def appliance_hum():
    """Slightly unsteady hum, off to the right; one more line joins later."""
    left_lag_s, join_s = 0.00019, 6.7
    arrival_s = T + left_lag_s / 2 * np.array([[-1], [1]])
    line = lambda hz, db: amp(db - 3.5) * np.sin(2 * np.pi * hz * arrival_s + 0.5 * wobble(4.5))
    hum = sum(line(hz, db) for hz, db in HUM_LINES)
    return hum + line(208, -57.5) * np.clip((T - join_s) * 20, 0, 1)


def room_noise():
    """Steady low noise floor."""
    return amp(-50) * unit(ports(noise(N), eq(ROOM_SPECTRUM)))


def kitchen_reverb(x):
    """Small-room tail, each frequency decaying at its own rate."""
    predelay_s = 0.0049
    hz, t, spectra = signal.stft(noise(SR // 3), SR, nperseg=256)
    tail = signal.istft(spectra * amp(-60 * t / along(ROOM_DECAY, hz)[:, None]), SR, nperseg=256)[1]
    tail = np.pad(tail, ((0, 0), (round(predelay_s * SR), 0)))
    tail = ports(tail, eq([(100, 6.2), (1000, 1.3), (12000, 9)]))
    return signal.fftconvolve(x[:1], tail / np.linalg.norm(tail[0]), axes=1)[:, :N]


def hand_speed(start_s, length_s):
    """Half sine: rest, motion, rest."""
    return np.sin(np.pi * np.clip((T - start_s) / length_s, 0, 1)).clip(0)


def cutoff_gate(fade_s=0.004, mute_s=0.07):
    """The rasp and crunch cut off abruptly: gain 0 just after each cutoff, else 1."""
    return np.prod([np.clip((s - T) / fade_s, 0, 1) + (T > s + mute_s) for s in CUTOFFS], axis=0)


def ring(modes, t, rise_cycles, spread_rad):
    """Decaying modes; higher ones reach the two ports further out of phase."""
    hz, db, t60 = np.transpose(modes)[:, :, None]
    decay = amp(db + rng.normal(0, 1, hz.shape) - 60 * t / t60)
    rise = 1 - np.exp(-(t * hz / rise_cycles) ** 2)
    offset = spread_rad * np.minimum(hz / 800, 1) * rng.choice([-1, 1], hz.shape)
    phase = 2 * np.pi * (hz * t + rng.random(hz.shape))
    return np.array([(decay * rise * np.sin(phase + side * offset)).sum(0) for side in (1, -1)])


def ports(pair, colour, left_lag_s=0.00012):
    """Two independent signals to coloured, partly coherent left and right."""
    angle = lambda f: np.arccos(np.clip(along(COHERENCE, f), 0, 0.99)) / 2
    mid, side = filtered(pair, lambda f: colour(f) * np.array([np.cos(angle(f)), np.sin(angle(f))]))
    lag = lambda f: np.exp(1j * np.pi * np.outer([-1, 1], f * left_lag_s))
    return filtered(np.array([mid + side, mid - side]), lag)


def resonance(f, hz, width_hz):
    """Response of one damped resonance."""
    return 1j * f * width_hz / (hz * hz - f * f + 1j * f * width_hz)


def filtered(x, response):
    """Apply a complex frequency response."""
    n = x.shape[-1]
    m = next_fast_len(n + 8192)
    return irfft(rfft(x, m) * response(np.fft.rfftfreq(m, 1 / SR)), m)[..., :n]


def along(points, hz):
    """Interpolate (f/Hz, value) points on a log axis."""
    f, values = np.transpose(points)
    return np.interp(np.log(hz + 1), np.log(f + 1), values)


def eq(points):
    """Response through (f/Hz, level/dB) points."""
    return lambda f: amp(along(points, f))


def noise(n):
    """Two independent white noises."""
    return rng.standard_normal((2, n))


def burst(t, t60_s):
    """Decaying noise pair."""
    return amp(-60 * t / t60_s) * noise(len(t))


def wobble(knots_per_s):
    """Smooth random curve; rms 1."""
    knots = rng.standard_normal(int(N * knots_per_s / SR) + 4)
    return unit(map_coordinates(knots, [T * knots_per_s], order=2))


def add(track, start_s, sound):
    """Mix a sound in."""
    i = max(round(start_s * SR), 0)
    track[:, i:i + sound.shape[1]] += sound[:, :N - i]


def amp(db):
    """dB to gain."""
    return 10 ** (np.asarray(db) / 20)


def unit(x):
    """Scale to rms 1."""
    return x / np.sqrt(np.mean(x ** 2) + 1e-20)


def scene():
    """Counter work with reverb; low thuds and background without."""
    cutting = leaves_and_sprouts() + rib_snaps() + knife_knocks() + pockets(sawing(), depth_db=2.5)
    work = cutting + leaf_squeaks() + pot_rubs() + ware_clinks()
    reverb = amp(-7) * kitchen_reverb(work)
    lows = board_shoves() + counter_rumble() + deep_judder()
    return work + reverb + lows + appliance_hum() + room_noise()


def record(dry):
    """Soft peak limiting, then a brick-wall low-pass."""
    top_hz = 16100
    rounded = dry / (1 + np.abs(dry) ** 6) ** (1 / 6)
    return filtered(rounded, lambda hz: hz < top_hz)


dry = scene()
out = record(dry)
unload_wav(out)
```